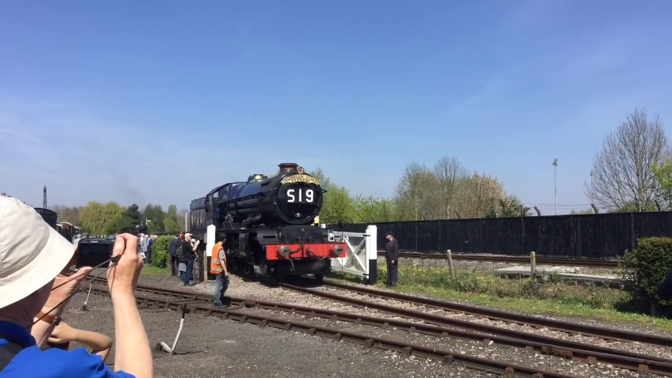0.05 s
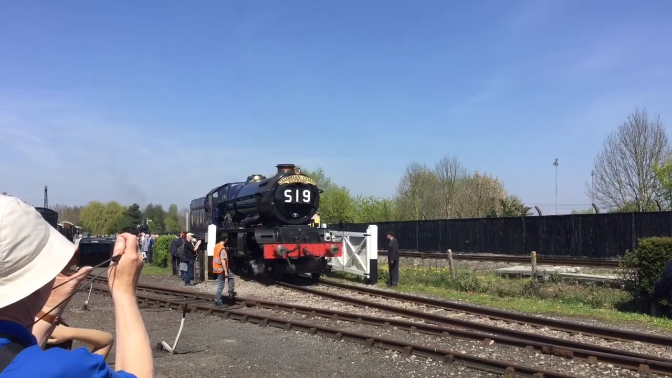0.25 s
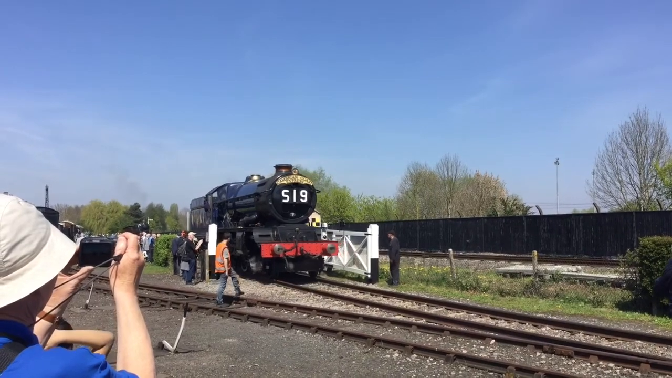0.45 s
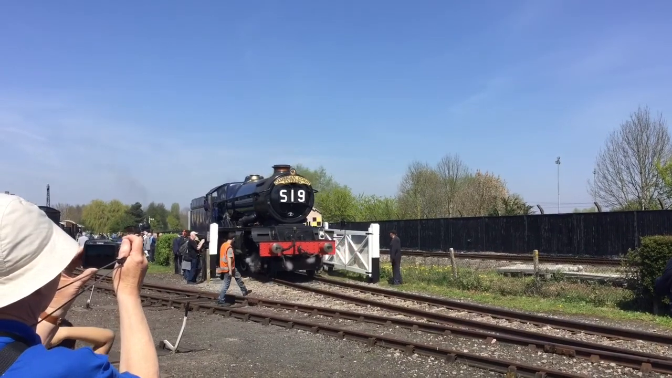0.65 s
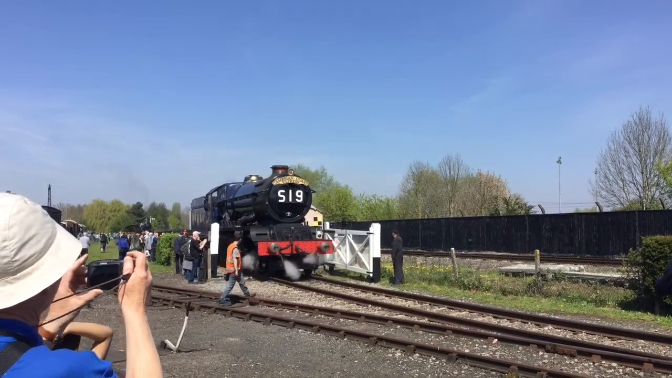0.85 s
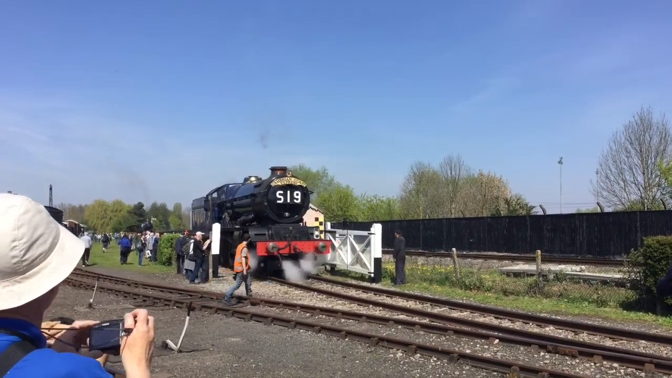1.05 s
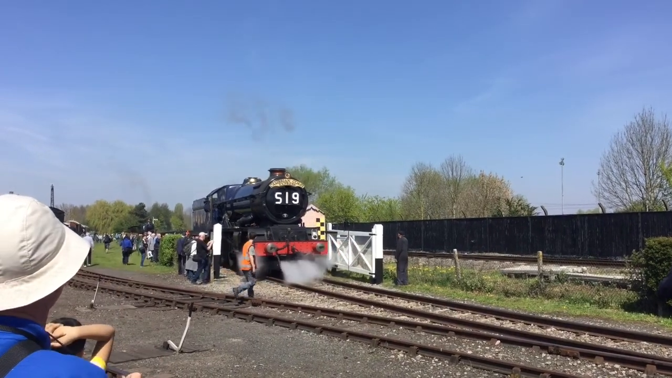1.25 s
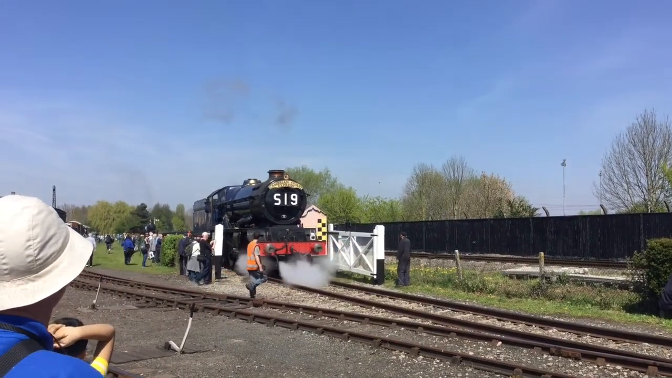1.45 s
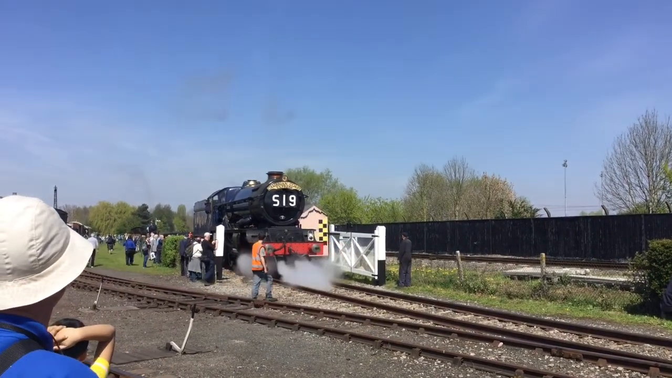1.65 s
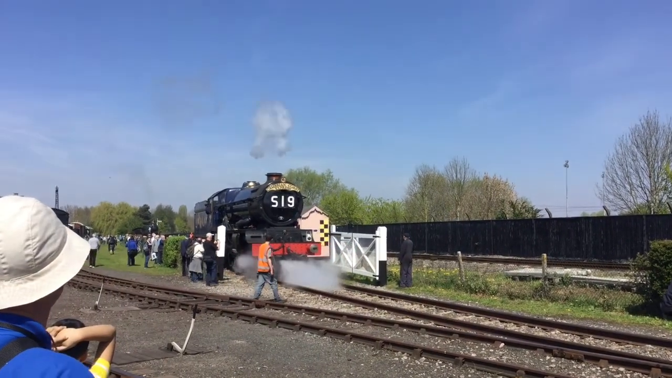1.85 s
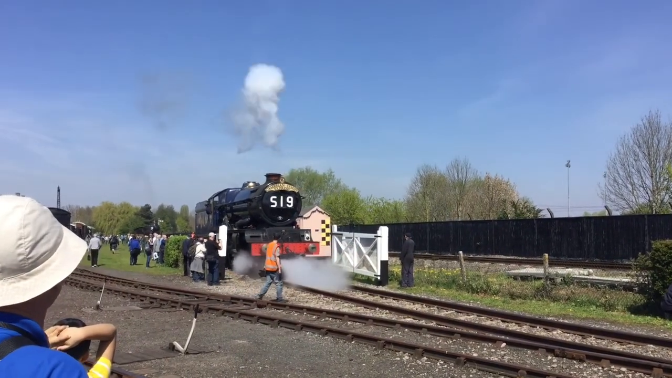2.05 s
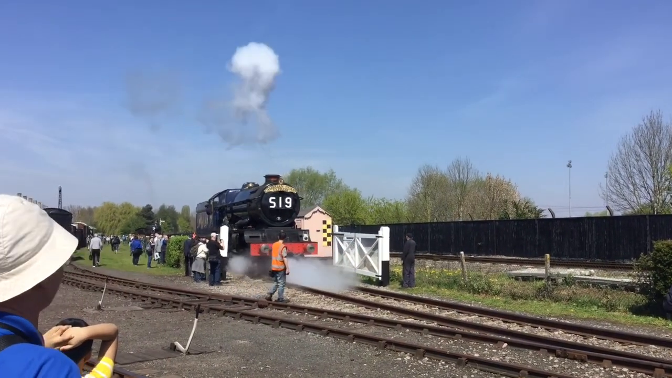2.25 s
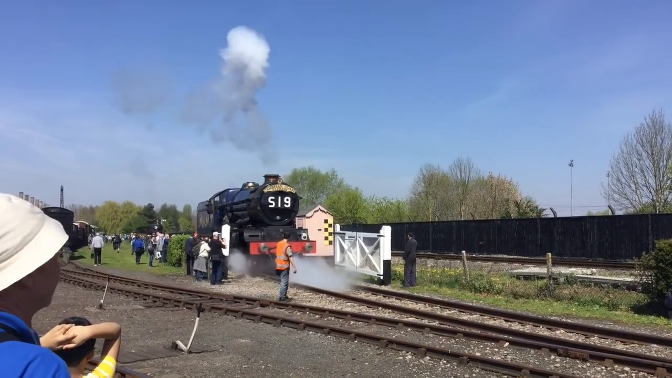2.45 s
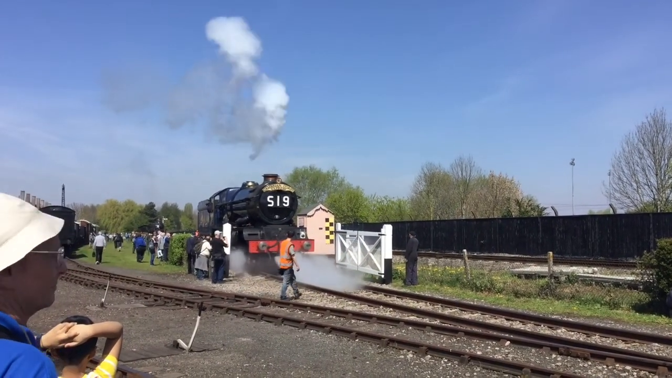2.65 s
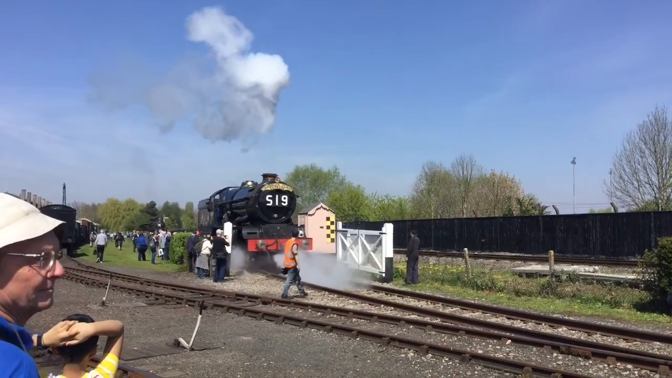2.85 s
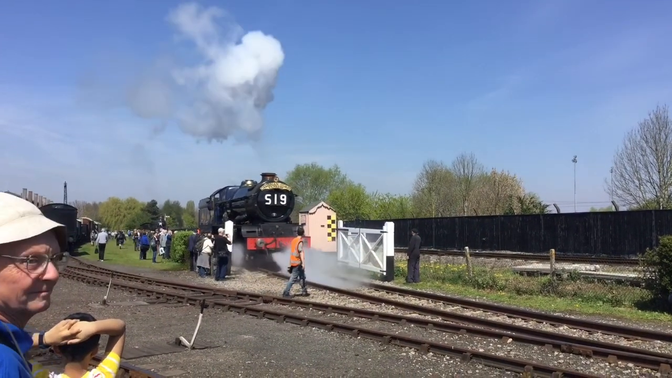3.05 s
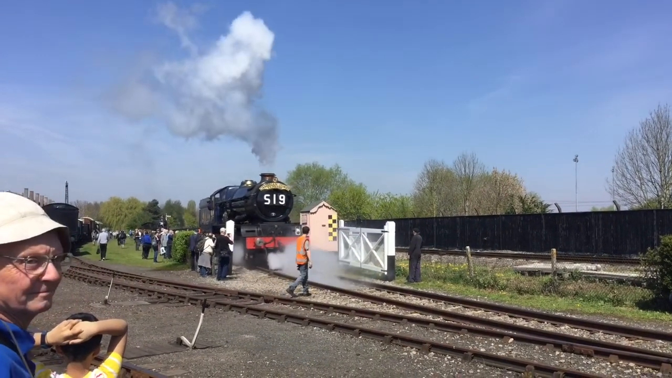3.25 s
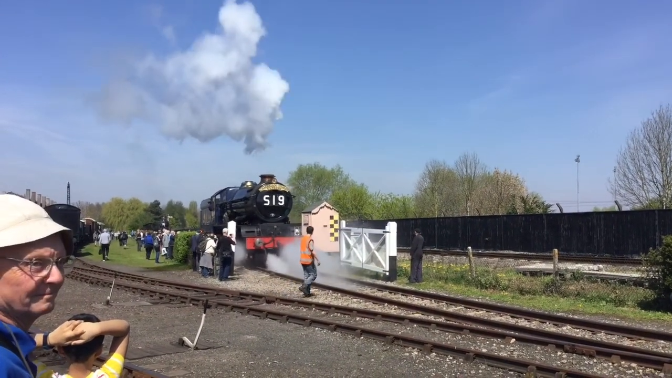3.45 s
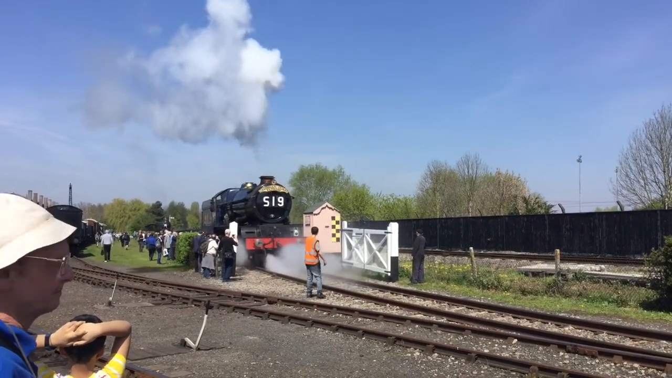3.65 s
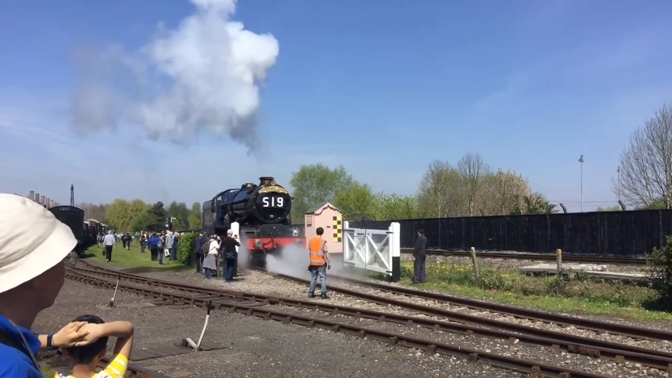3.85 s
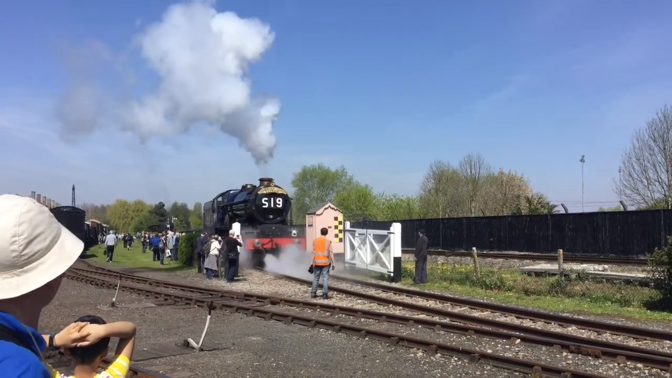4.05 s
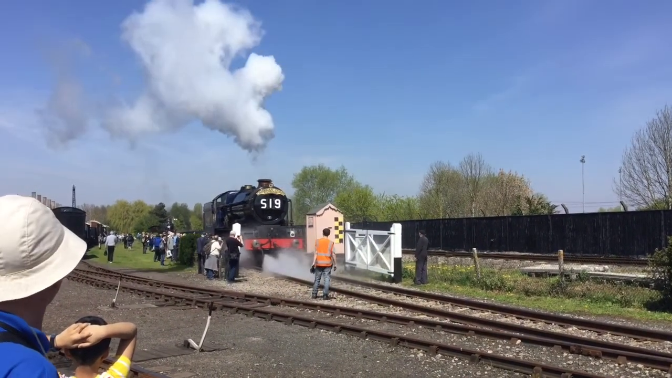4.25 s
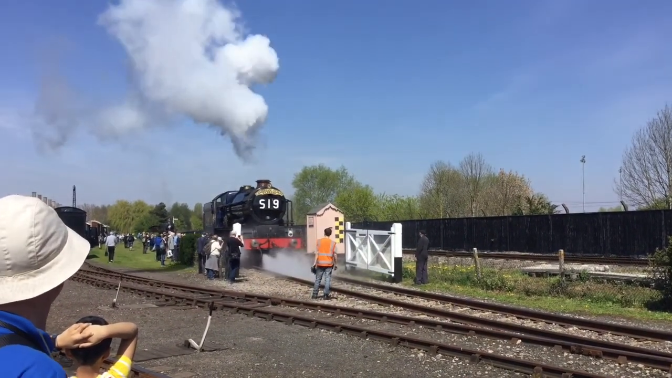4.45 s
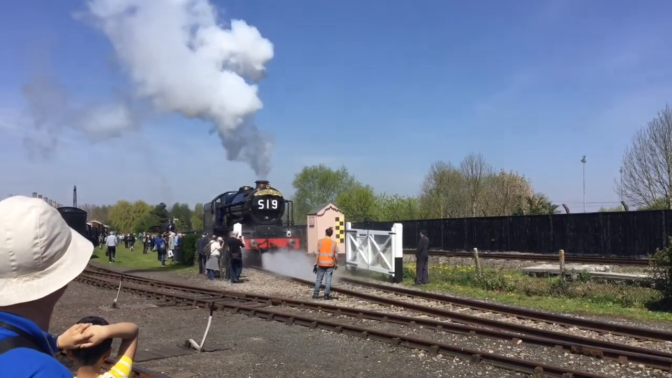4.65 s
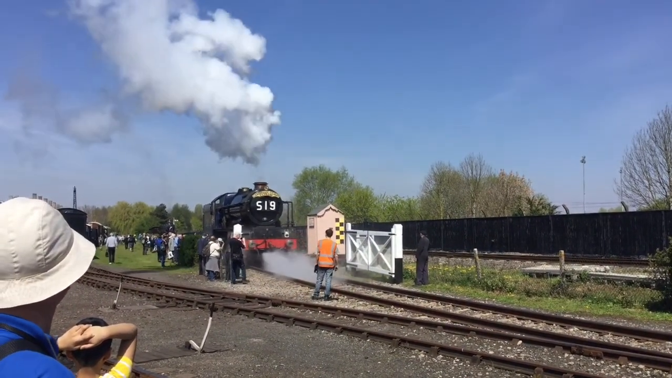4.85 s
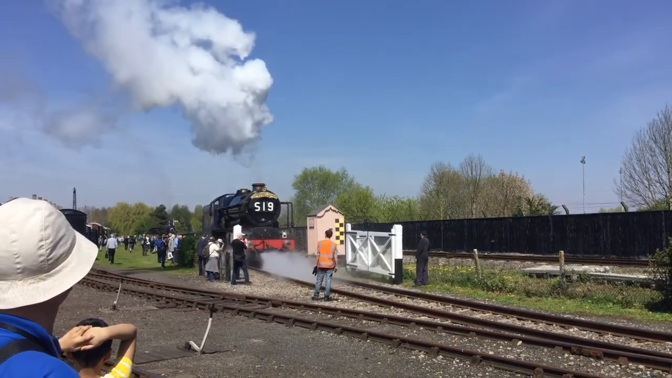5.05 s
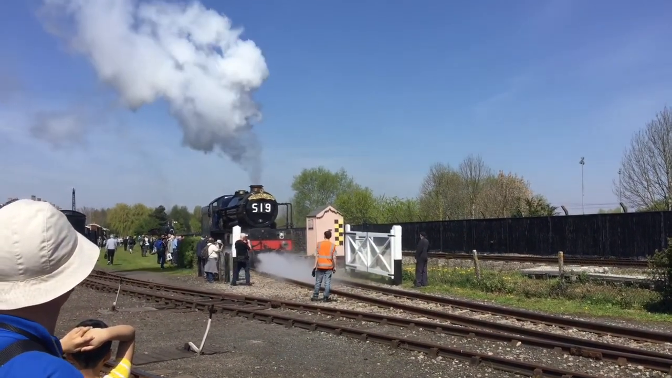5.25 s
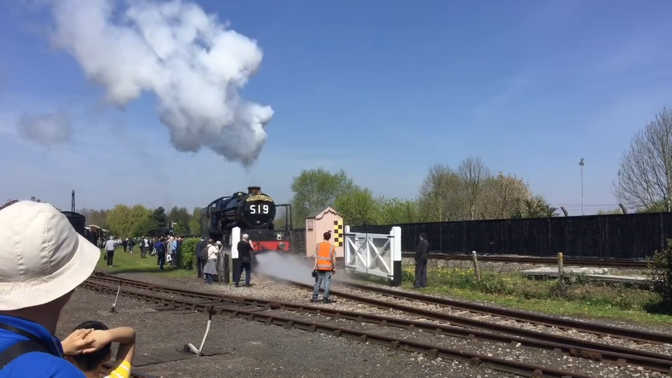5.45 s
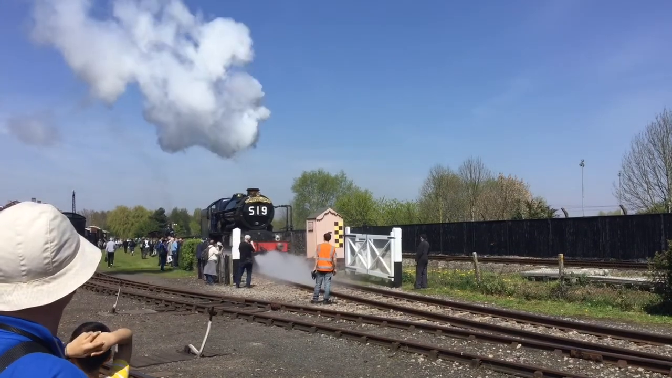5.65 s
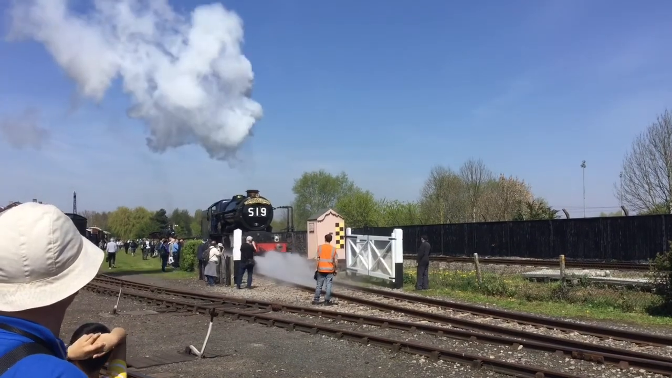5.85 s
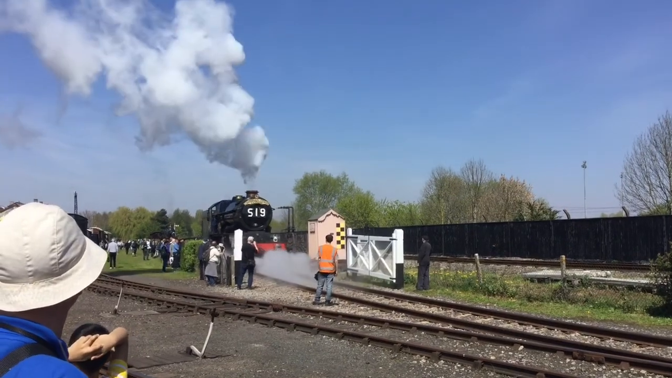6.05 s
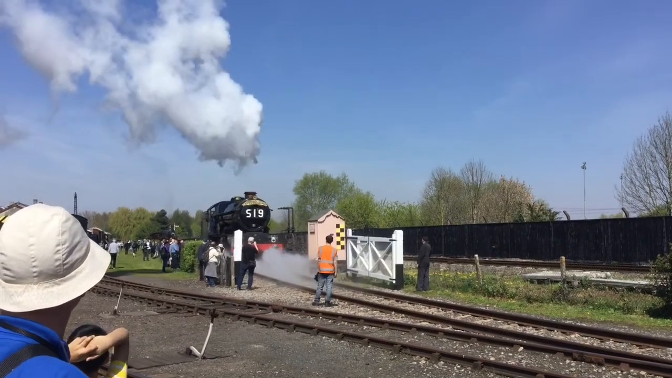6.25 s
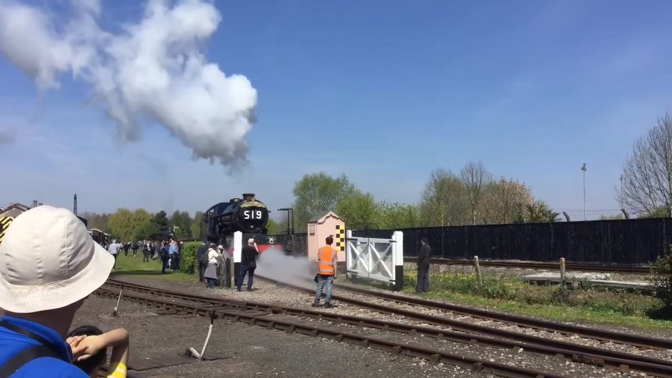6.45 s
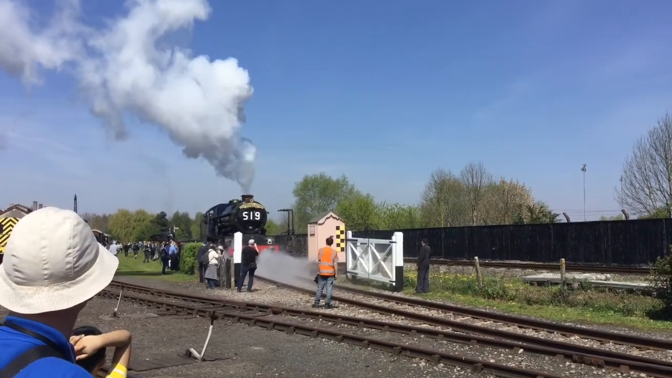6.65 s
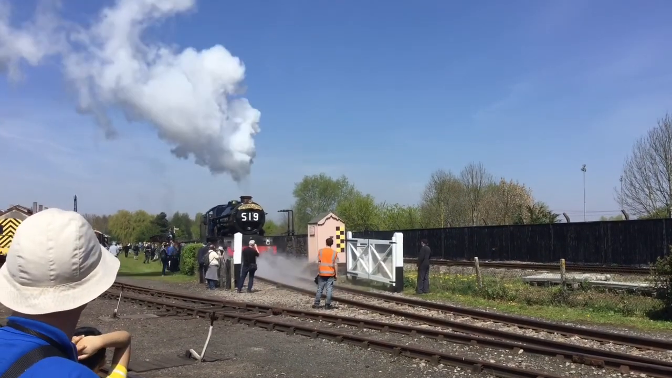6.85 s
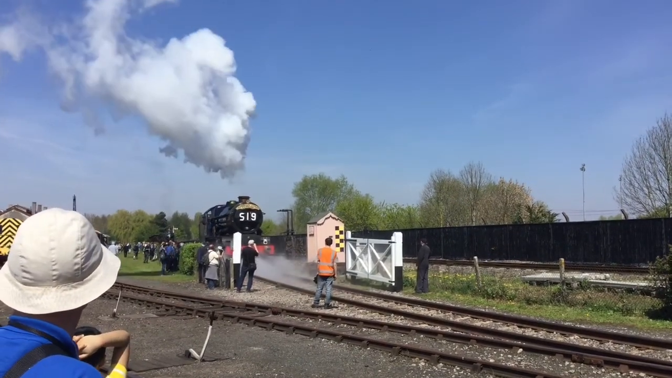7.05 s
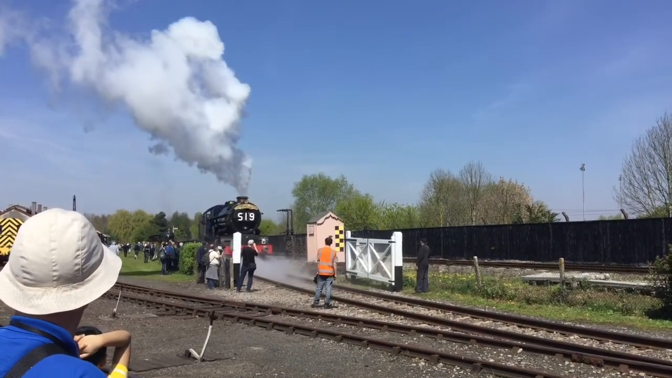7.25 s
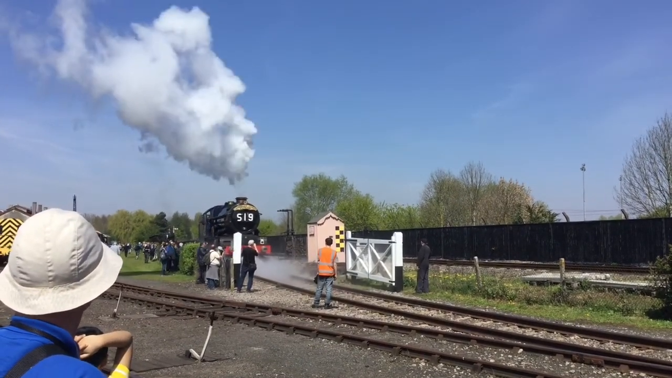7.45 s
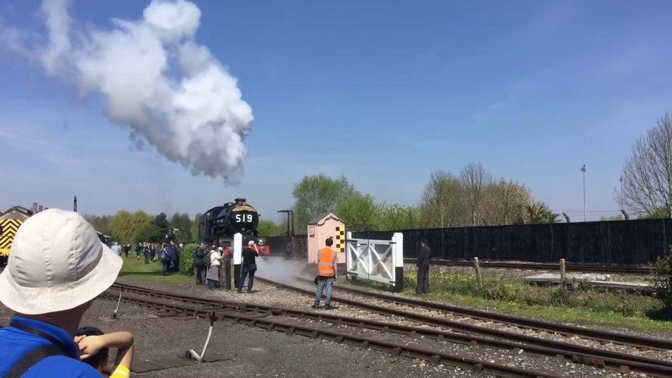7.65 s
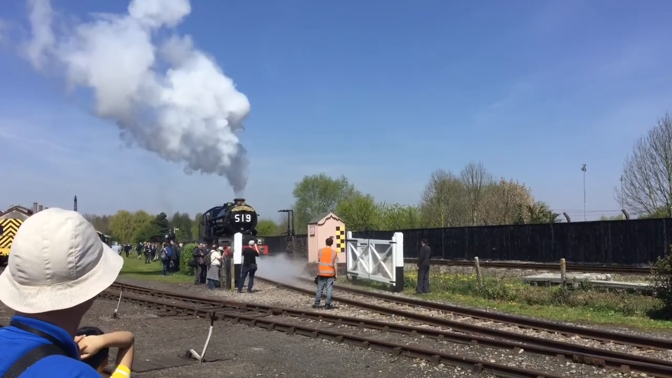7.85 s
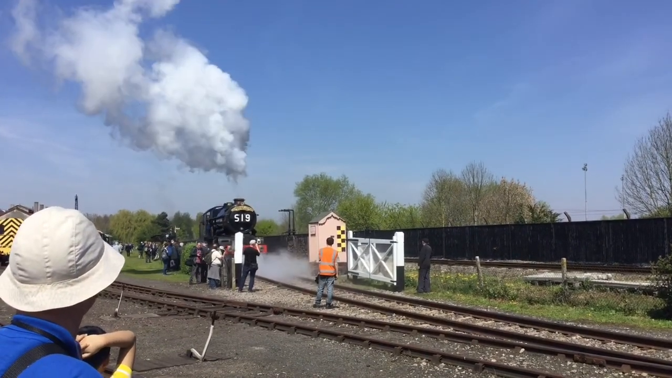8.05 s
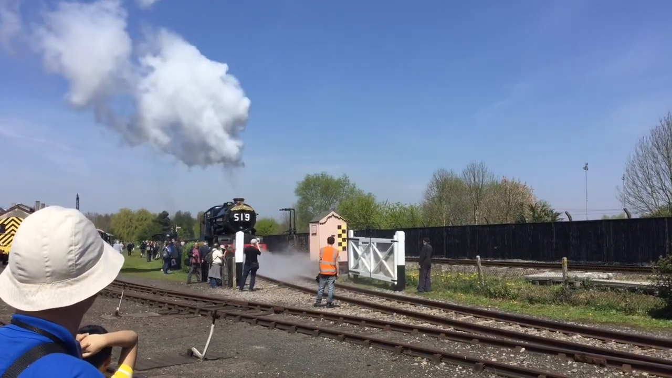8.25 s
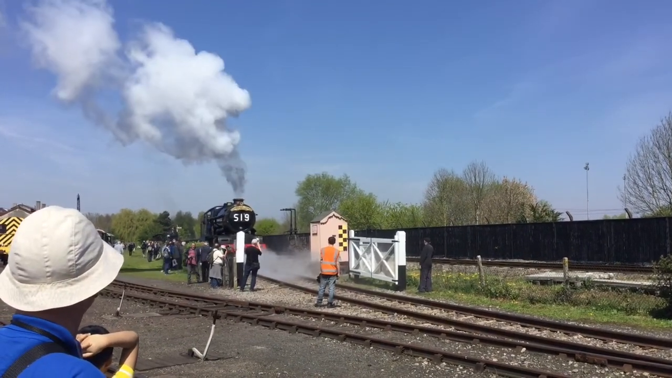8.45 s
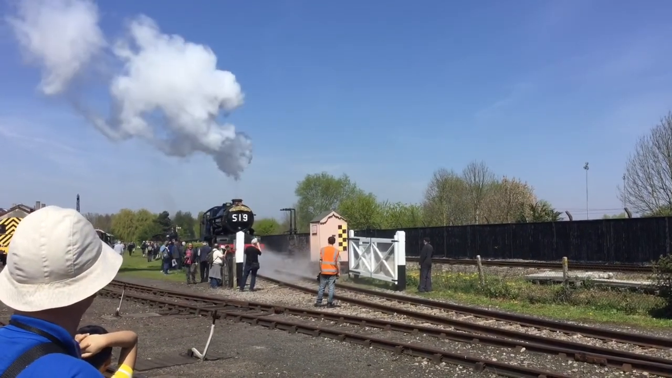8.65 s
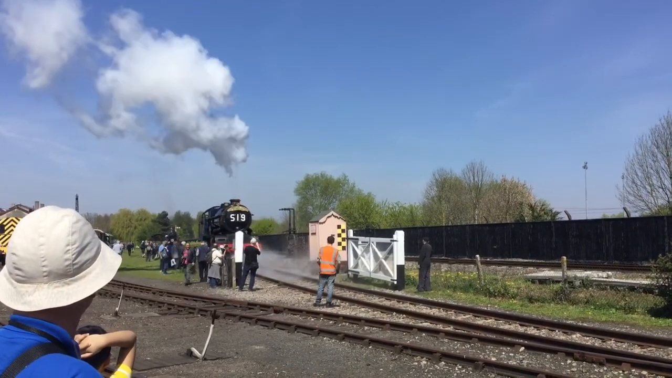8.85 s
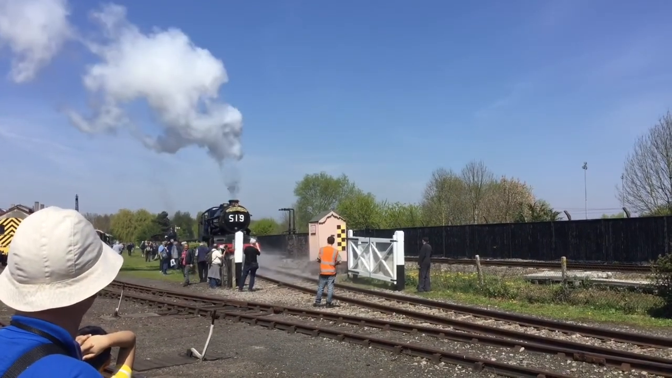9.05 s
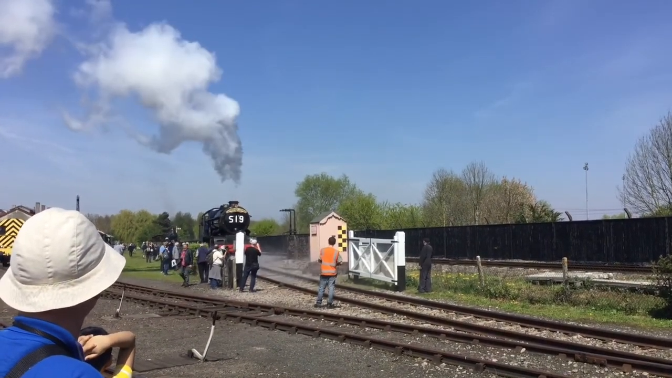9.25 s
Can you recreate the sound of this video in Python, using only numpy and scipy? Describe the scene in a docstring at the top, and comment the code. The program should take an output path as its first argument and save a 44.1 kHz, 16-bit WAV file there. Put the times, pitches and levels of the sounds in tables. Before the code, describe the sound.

Open air, handheld phone, both channels alike. For the first 0.7 s there is only a small, thin steam leak, low wind rumble, a faint hollow drone and a few soft microphone bumps. At 0.7 s a short dull exhaust thump sounds with a tiny spit; from 0.9 s drain cocks open and a broad hiss climbs quickly, loud by 1.3 s. From 2 to 6 s it roars in joined surges of 0.2 to 0.6 s, with narrow hollow tones sliding inside it and brief fizzing spurts. Soft, booming chuffs fall unevenly at about 1.9, 3.1, 4.0, 4.6, 5.2, 5.9, 6.6, 7.2, 7.9 and 8.8 s. Wind knocks cluster around 4.1 to 5 s and 5.5 to 8.2 s, strongest near 6.7. The hiss gradually weakens after 6 s, surges briefly at 7.7, drops after 8.4, and lifts slightly near 9 before fading towards 9.3 s.

```python
"""Drain cocks of a steam locomotive starting off in the open air: banded noise jets that surge, several
surges often joining in one piston stroke, and fade as it draws away; narrow bands ring in the hiss.
Around them: filtered-noise leak and spurts, soft uneven exhaust beats of noise and a decaying boom,
wind rumble and a drone of shaped noise, and a breeze knocking on a phone microphone as short noise bursts."""
import sys
import numpy as np
from scipy import signal
from scipy.fft import rfft, irfft
from scipy.io import wavfile
from scipy.ndimage import uniform_filter1d

SR = 44100
rng = np.random.default_rng(int(sys.argv[2]) if len(sys.argv) > 2 else 0)


def output_pcm(signal):
    """Save a mono or channel-first signal as 16-bit PCM at the path in sys.argv[1].

    Samples are clipped to [-1, 1] before scaling.
    """
    pcm = np.clip(np.atleast_2d(signal).T, -1, 1) * 32767
    wavfile.write(sys.argv[1], SR, np.round(pcm).astype(np.int16))


N = 410571
TIME = np.arange(N) / SR
STEPS = TIME[::200]  # coarse grid for slow jet controls, s
BINS = np.maximum(np.fft.rfftfreq(N, 1 / SR), 1)  # Hz

# drain-cock flow before surge lifts and flutter: t/s, level/dB
BLOW = [(.86, -53), (1.0, -35), (1.1, -29), (1.21, -23), (2.0, -20.5), (3.4, -20.5), (4.2, -19),
        (5.0, -20.5), (5.9, -22), (6.17, -23.5), (6.4, -21), (7.55, -24.5), (8.35, -25.5), (8.7, -31),
        (9.15, -32), (9.31, -36.5)]
# eddy sizes, large to small: f/Hz, change when weak/dB, change when turned away/dB
EDDIES = [(490, 1, -1.5), (1100, 8.5, -1), (2440, -0.5, -3), (3300, -1, -1.5), (4570, -6.5, 2),
          (7700, -7.5, 1.5), (13100, -15.5, 2.5)]


def amp(db):
    """Decibels to gain."""
    return np.exp(np.asarray(db) * (np.log(10) / 20))


def unit(x):
    """Scale to rms 1."""
    return x / np.sqrt(np.mean(x ** 2))


def curves(table):
    """Table columns interpolated linearly over time, one value a sample."""
    s, *columns = np.transpose(table)
    return [np.interp(TIME, s, column) for column in columns]


def colour(points):
    """Gain on every bin from (Hz, dB) points, linear in dB over log frequency."""
    hz, db = np.transpose(points)
    return amp(np.interp(np.log(BINS), np.log(hz), db))


def noise(gain):
    """Random-phase noise of rms 1 with the given gain on every bin."""
    phase = 2 * np.pi * rng.random(len(BINS), dtype=np.float32)
    return unit(irfft(np.exp(1j * phase) * gain, N))


def walk(rate_hz):
    """Smoothed random wander of rms 1, with rate_hz random points a second."""
    points = rng.standard_normal(int(N / SR * rate_hz) + 4)
    path = np.interp(TIME * rate_hz, np.arange(len(points)), points)
    return unit(uniform_filter1d(path, int(SR / rate_hz / 2) + 1))


def band(x, lo_hz, hi_hz, order=2):
    """Causal band-pass."""
    edges_hz = [lo_hz, min(hi_hz, SR / 2 - 100)]
    return signal.sosfilt(signal.butter(order, edges_hz, "band", fs=SR, output="sos"), x)


def strike(track, s, sound, db):
    """A track with one more sound in it, at a time and peak level."""
    start = int(s * SR)
    sound = sound[:N - start]
    sound = sound * amp(db) / np.abs(sound).max()
    return track + np.pad(sound, (start, N - start - len(sound)))


def drain_cocks(gain_db=0.18, flicker_db=1.0, flutter_db=0.19, spit_db=0.5):
    """Turbulent jets: large eddies give body and roar, small ones hiss and fizz; water makes them spit."""
    # jet colour: f/Hz, relative level/dB
    jet_spectrum = [(280, -12), (480, -13.5), (680, -14.5), (870, -12.5), (1100, -7.5), (1550, -2.5),
                    (1950, -0.2), (2650, 0.2), (2800, -1.5), (2950, -3.5), (3130, -1.5), (3800, -3.5),
                    (4350, -4), (4600, -5.5), (4760, -5), (4950, -6.5), (5300, -5), (5850, -5),
                    (6300, -2.5), (7900, -4), (8700, -6.5), (11800, -5.5), (15600, -14)]
    log_eddy_hz = np.log(np.transpose(EDDIES)[0])
    log_bins = np.log(BINS)
    centres = np.log(np.geomspace(500, 14000, 18))
    jet, lifts = unit(colour(jet_spectrum)), eddy_lifts()
    jets = 0
    for centre, own in zip(centres, np.eye(len(centres))):
        # overlapping bands share the jet's power
        gain = jet * np.sqrt(np.interp(log_bins, centres, own))
        weights = np.array([np.interp(centre, log_eddy_hz, size) for size in np.eye(len(log_eddy_hz))])
        lift_db = np.interp(TIME, STEPS, weights @ lifts)
        # each band swells and sinks on its own as the plume billows
        swell = amp(lift_db + flicker_db * walk(34))
        jets = jets + noise(gain) * np.sqrt(np.mean(gain ** 2)) * swell
    flow_db = curves(BLOW)[0] + gain_db
    return ground_echo(jets * amp(flow_db + flutter_db * walk(24) + spit_db * walk(300)))


def eddy_lifts(full_jet_db=-20.5, weak_span_db=13, turn_s=4.84, turn_length_s=0.45, body_share=0.35):
    """Lift in dB by eddy size: surges lift the jets, weak jets dull, jets swinging away lose roar."""
    push, body, roar, hiss, fizz = surges()
    _, weak_db, turned_db = np.transpose(EDDIES)
    flow_db = np.interp(STEPS, *np.transpose(BLOW))
    weak = np.clip((full_jet_db - flow_db) / weak_span_db, 0, 1)
    large = body_share * push  # large eddies follow a surge only in part
    surge_db = np.array([large, large + body, push + roar, push + roar,
                         push + hiss, push + hiss, push + fizz])
    return surge_db + np.outer(weak_db, weak) + np.outer(turned_db, ramp(turn_s, turn_length_s))


def surges(attack_s=.09, release_s=.08):
    """The jets surge: each surge swells, holds and sinks, several often joining in one piston stroke."""
    # t/s, length/s, push/dB, then extra body/dB, roar/dB, hiss/dB, fizz/dB
    surge_table = [(1.23, 0.39, 3.9, -2, -.2, 1, -4), (1.62, 0.28, 3.2, -3.5, 2, -0.5, 5),
                   (2.07, 0.32, 3.4, 4.8, -0.5, -0.5, 1), (2.42, 0.56, 3.9, 2.5, 0.8, -3, -0.5),
                   (2.93, 0.37, 2.1, 2, -0.4, -0.7, 0.5), (3.39, 0.13, 1.2, -1.5, -1.7, .5, 1),
                   (3.53, .19, 3.2, 2.5, 0, 1.5, .5), (3.72, 0.4, 3.8, -0.5, 0.8, -1.5, -2.5),
                   (4.25, .27, 4.9, 0.5, -.3, -1.6, -1), (4.52, 0.21, 2.6, -0.5, 1.5, 0, 0),
                   (5.07, 0.29, 4.5, 0.5, 0.5, 0.5, -6.5), (5.36, 0.27, 2.2, 0.5, -1.2, 1, -2.5),
                   (5.6, .27, 2.6, 6, 2, 0.2, -8.5), (5.87, 0.35, 1, 5.5, 2, 1.7, 2),
                   (6.322, 0.3, 1.7, 4, 0.1, -0.5, -5), (6.67, 0.72, 1.4, 1.8, -0.5, -0.7, -3.5),
                   (7.662, 0.3, 5, 0, -1, -1, -2.5), (8.95, 0.15, 2.7, 0.5, -2.5, 0.5, -.7)]
    lift_db = 0
    for s, length_s, *lifts_db in surge_table:
        swell = ramp(s, attack_s) * (1 - ramp(s + length_s, release_s))
        lift_db = lift_db + np.outer(lifts_db, swell)
    return lift_db


def ramp(s, length_s):
    """A smooth step from 0 to 1, centred on a time."""
    return (1 + np.tanh(2 * (STEPS - s) / length_s)) / 2


def ground_echo(x, share=.11, drift=.06, drift_rate_hz=1.0):
    """Ground and engine return the sound a moment later; moving air shifts the combs that this makes."""
    # detours of the hiss: lag/ms before drift
    path_lags_ms = [2.1, 2.6, 3.3, 4.1, 5.2, 6.6]
    samples = np.arange(N)
    heard = x
    for lag_ms in path_lags_ms:
        lag = lag_ms * SR / 1000 * (1 + drift * walk(drift_rate_hz))
        heard = heard + share * np.interp(samples - lag, samples, x)
    return heard / np.sqrt(1 + len(path_lags_ms) * share ** 2)


def hollow_tones(wander_hz=25, fade_s=.13):
    """The hiss turns hollow as the engine moves: narrow noise bands ring, slide and fade."""
    # t at half fade-in/s, length/s, rms level before fades/dB, start f/Hz, end f/Hz, width/Hz
    tone_table = [(1.151, .6, -31.5, 1920, 1838, 240), (1.202, 1.72, -32, 2430, 2532, 280),
                  (1.228, .22, -30, 3450, 3910, 380), (2.099, .75, -28.5, 2280, 2420, 560),
                  (1.701, 0.2, -29, 3270, 3370, 261.5), (3.08, 0.27, -32, 2000, 2560, 150),
                  (2.402, 1.85, -36.5, 3730, 3886, 300), (3.4, 0.44, -33, 1900, 1850, 164),
                  (3.597, 1.12, -32, 2550, 2460, 220), (4.549, 1.15, -33, 1975, 1930, 130),
                  (4.651, .3, -32, 2370, 2310, 130), (4.77, 0.12, -28, 3400, 3270, 400),
                  (4.997, 0.3, -29.5, 3170, 3090, 130), (5.1, 0.44, -38, 2050, 2240, 120),
                  (6.299, 0.4, -34, 3720, 3770, 220), (7.651, 1.0, -48.5, 801, 761, 160),
                  (8.303, 0.41, -41, 1345, 1213, 110), (8.599, 0.26, -41.5, 1930, 2010, 130)]
    out, wander = np.zeros(N), wander_hz * walk(12)
    for s, length_s, db, start_hz, end_hz, width_hz in tone_table:
        t = TIME[:int((length_s + fade_s) * SR)]
        slide_hz = np.interp(t, [0, length_s], [start_hz, end_hz])
        hz = slide_hz + np.roll(wander, -int(s * SR))[:len(t)]
        low_pass = signal.butter(2, width_hz / 2, fs=SR, output="sos")
        narrow = signal.sosfilt(low_pass, rng.standard_normal((2, 2 * SR)))[:, :len(t)]
        phase = 2 * np.pi * np.cumsum(hz) / SR
        # quadrature noise moves the low band up to hz
        ringing = unit(narrow[0] * np.cos(phase) + narrow[1] * np.sin(phase))
        fade = np.clip(np.minimum(t, t[-1] - t) / fade_s, 0, 1)
        out = out + np.pad(ringing * fade * amp(db), (int((s - fade_s / 2) * SR), N))[:N]
    return out


def spurts():
    """Steam squeezes through a narrow gap for a moment: a broad spit or a thin whistle."""
    # Gaussian bursts: centre t/s, level at centre/dB, half length/s, centre f/Hz, half width/octaves
    spurt_table = [(0.716, -35, 0.016, 3000, 1.4), (0.724, -37, .04, 1890, 0.86),
                   (1.4, -27, .05, 13800, .16), (1.472, -32, .06, 6500, 0.1),
                   (1.899, -23.5, 0.041, 3700, 0.19), (1.91, -23, .022, 7160, 0.12),
                   (2.329, -26.5, 0.11, 5800, .13), (2.78, -25.5, .05, 7500, .1),
                   (3.228, -22, 0.076, 13200, 0.16), (4.416, -22.5, .045, 7200, 0.096),
                   (5.061, -25, 0.066, 1750, 0.38), (6.76, -29, .03, 11000, 0.22),
                   (7.716, -28.5, 0.05, 2330, .4), (7.78, -25, .06, 7700, 0.19),
                   (8.397, -36.5, 0.17, 3270, .2)]
    out, t = np.zeros(N), TIME[:SR] - .5
    bins = np.maximum(np.fft.rfftfreq(SR, 1 / SR), 1)
    for s, db, length_s, hz, octaves in spurt_table:
        hump = np.exp(-(np.log2(bins / hz) / octaves) ** 2 / 2)
        steam = unit(irfft(rfft(rng.standard_normal(SR)) * hump, SR))
        burst = steam * amp(db) * np.exp(-(t / length_s) ** 2 / 2)
        out = out + np.pad(burst, (int((s - .5) * SR), N))[:N]
    return out


def leak(peaks_db=4, waver_db=0.55):
    """A small steam leak, coloured by resonances of the pipes and plates around it."""
    # t/s, level before waver/dB
    leak_level = [(0, -38.5), (.17, -37), (.44, -39), (.56, -40.5), (.9, -41), (1.5, -39), (9.31, -38.5)]
    # resonances: f/Hz, width/Hz, level before peaks_db/dB
    leak_peaks = [(660, 140, 1), (1120, 240, 1.5), (1630, 100, 4), (2040, 90, -4), (2400, 170, -7),
                  (3510, 260, -3), (3940, 120, -9), (5230, 190, 0), (5700, 260, -3), (6200, 250, -3),
                  (7040, 250, 0), (8650, 650, -7)]
    # f/Hz, relative level/dB
    leak_spectrum = [(300, -2), (520, -11), (850, -3), (1200, -3.5), (1400, -5), (1800, -1.5), (2300, -3.5),
                     (4400, -9.5), (6300, -8.5), (7700, -13.5), (9300, -12), (12000, -17), (15800, -29)]
    peaks = sum(amp(db) / (1 + (2 * (BINS - hz) / width_hz) ** 2) for hz, width_hz, db in leak_peaks)
    hiss = noise(colour(leak_spectrum) * (1 + amp(peaks_db) * peaks))
    return hiss * amp(curves(leak_level)[0] + waver_db * walk(7))


def exhaust(rise_s=0.0016, chuff_db=-7, chuff_top_hz=490, octaves_per_db=-0.1,
            ring_hz=112, ring_s=0.0087, ring_db=6):
    """Steam slugs boom in the chimney and chuff; a brighter beat has a louder chuff with a lower top."""
    # t/s, peak/dB, length/s (Gaussian, down to exp(-2)), brightness/dB (chuff level before chuff_db)
    beat_table = [(0.716, -12.5, 0.04, -28), (1.858, -27, 0.11, -8), (3.113, -22.5, 0.16, 0),
                  (3.992, -16.5, 0.051, -6), (4.558, -17, 0.22, 3), (5.158, -22, 0.08, -14),
                  (5.852, -17.5, 0.12, -4), (6.603, -14, 0.12, -8), (7.19, -18.5, 0.092, -7),
                  (7.867, -12, 0.038, -14.5), (8.848, -20, 0.05, -12)]
    out, t = np.zeros(N), TIME[:SR]
    for s, db, length_s, bright_db in beat_table:
        white = rng.standard_normal((2, SR))
        top_hz = max(chuff_top_hz * 2 ** (octaves_per_db * bright_db), 200)
        body = unit(band(white[0], 60, 206, order=3))
        chuff = amp(chuff_db + bright_db) * unit(band(white[1], 155, top_hz, order=3))
        gas = (body + chuff) * np.exp(-2 * (t / length_s) ** 2)
        boom_hz = ring_hz * rng.uniform(1.0, 1.11)
        boom = amp(ring_db) * np.sin(2 * np.pi * boom_hz * t) * np.exp(-t / ring_s)
        out = strike(out, s, (gas + boom) * (1 - np.exp(-t / rise_s)), db)
    return out


def wind_rumble(db=3.0, lump_db=2.5, own_db=4.0, split_hz=140, lump_limit=1.7, usual_db=-37, darken=0.24):
    """Wind rumble: lumpy low noise in two halves that vary on their own, darker when weak."""
    # t/s, level before db and lumps/dB
    rumble_level = [(0, -40), (.3, -40.5), (.95, -36.5), (1.45, -48.5), (2.2, -50.5), (3.0, -46),
                    (3.5, -39), (3.9, -38.5), (4.4, -35.5), (4.75, -31.5), (5.1, -41), (5.35, -40),
                    (5.7, -34), (6.07, -44), (6.25, -35.5), (6.45, -36), (6.7, -32), (7.1, -34.5),
                    (7.55, -37), (7.8, -32.5), (8.2, -35), (8.36, -49), (8.7, -39.5), (9.31, -46)]
    # f/Hz, relative level/dB
    rumble_spectrum = [(22, -33), (36, -15), (52, 1.5), (80, 3.5), (130, 2), (200, -3), (300, -7.5),
                       (390, -19), (600, -16.5), (1000, -41)]
    spectrum, level_db = colour(rumble_spectrum), curves(rumble_level)[0]
    deep = 1 / (1 + (BINS / split_hz) ** 6)
    tilt_db = darken * (usual_db - level_db)
    halves = 0
    for part, side in ((deep, 1), (1 - deep, -1)):
        lumps = np.tanh(walk(36) / lump_limit) * lump_limit
        halves = halves + noise(spectrum * np.sqrt(part)) * amp(side * tilt_db + own_db * lumps)
    return unit(halves) * amp(level_db + db + lump_db * np.tanh(walk(26)))


def drone(hz=158, octaves=0.5, level_db=-41.5, waver_db=2.5):
    """The fire draws through the boiler with a hollow drone: a noise hump of wavering level."""
    hump = np.exp(-(np.log2(BINS / hz) / octaves) ** 2 / 2)
    return noise(hump) * amp(level_db + waver_db * walk(12))


def breeze(spread=1.48):
    """Eddies strike the microphone port: short low noise bursts, from a sharp tap to a soft bump."""
    # t/s, peak/dB, band centre f/Hz, swell time before band-pass/ms
    knock_table = [(.249, -25, 110, 6), (0.442, -30, 95, 7), (.745, -22, 105, 9), (2.525, -27, 190, 4),
                   (2.93, -27, 132, 6), (3.196, -25, 230, 6.1), (3.21, -22, 85, 7),
                   (4.135, -19.5, 203, 5.5), (4.191, -21, 288.6, 2.5), (4.275, -20.5, 190, 7.3),
                   (4.39, -23, 190, 4), (4.552, -21, 400, 6), (4.563, -16, 125, 3.5), (4.59, -20, 170, 3.6),
                   (4.643, -18, 160, 5), (4.682, -21, 473, 2.8), (4.71, -15.5, 251, 5.1),
                   (4.854, -15.5, 260, 3.4), (4.868, -19, 150, 3), (4.904, -21, 130, 4.8),
                   (4.942, -23.5, 310, 2), (5.04, -23, 153, 7.4), (5.502, -25, 183, 6),
                   (5.648, -17, 150, 7.1), (5.92, -18.5, 210, 3.6), (6.203, -19, 197, 3.1),
                   (6.275, -23, 250, 4.4), (6.303, -16, 330, 1.7), (6.397, -25, 230, 6.4),
                   (6.558, -25, 290, 6.1), (6.624, -18, 210, 3), (6.654, -19.5, 179, 2.3),
                   (6.693, -13, 210, 3.2), (6.708, -10, 115, 2.5), (6.742, -21, 159, 2.1),
                   (6.875, -22.5, 260, 3), (7.004, -23, 90, 6), (7.273, -23, 150, 3.4),
                   (7.395, -21, 110, 7.9), (7.592, -19.5, 125, 3.4), (7.688, -17, 186, 2),
                   (7.763, -18, 252, 6), (7.888, -13, 175, 2), (7.975, -20.5, 249, 2.5),
                   (8.064, -23, 259, 2.7), (8.136, -19.5, 205, 7), (8.237, -23, 190, 6),
                   (8.725, -23.5, 170, 5), (8.851, -19.5, 218, 2.4), (9.235, -25.5, 95, 9)]
    out, t = np.zeros(N), TIME[:SR // 4]
    for s, peak_db, hz, swell_ms in knock_table:
        eddy = rng.standard_normal(len(t)) * t * np.exp(-1000 * t / swell_ms)
        out = strike(out, s, band(eddy, hz / spread, hz * spread, order=3), peak_db)
    return out


def scene():
    """Everything reaches one microphone, so both channels are alike."""
    steam = drain_cocks() + hollow_tones() + spurts() + leak()
    mono = steam + exhaust() + wind_rumble() + drone() + breeze()
    return np.array([mono, mono])


def record(dry, low_cut_hz=40, top_cut_hz=15750):
    """Close reflections ripple the treble; the phone cuts the deepest bass and the top."""
    # reflections off phone case, hand and things close by: lag/ms, signed share of direct sound
    near_echoes = [(.52, -0.0068), (.69, -0.026), (1.07, -0.018), (1.575, 0.06)]
    ripple = 1 + sum(share * np.exp(-2j * np.pi * BINS * ms / 1000) for ms, share in near_echoes)
    low_cut = 1 / np.sqrt(1 + (low_cut_hz / BINS) ** 8)
    heard = irfft(rfft(dry) * ripple * low_cut, N)
    return signal.sosfilt(signal.ellip(12, .2, 80, top_cut_hz, fs=SR, output="sos"), heard)


dry = scene()
out = record(dry)
output_pcm(out)
```